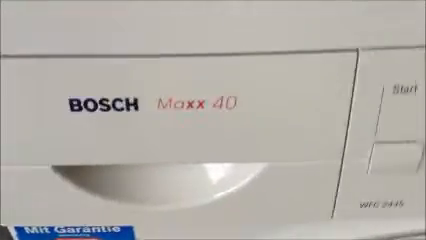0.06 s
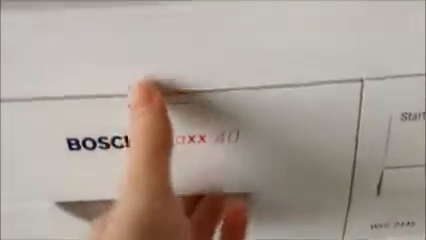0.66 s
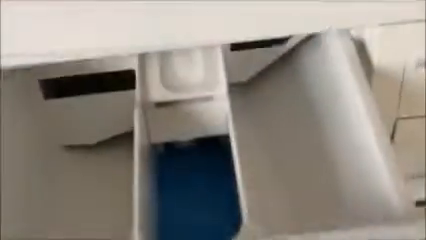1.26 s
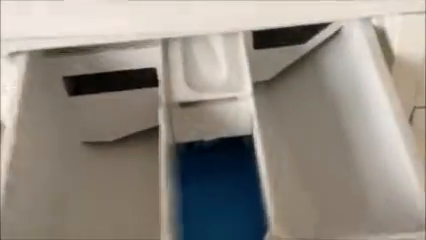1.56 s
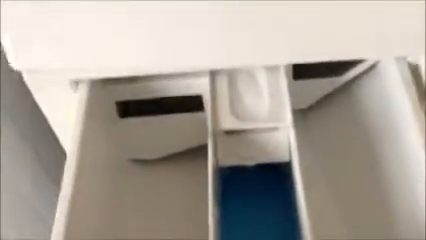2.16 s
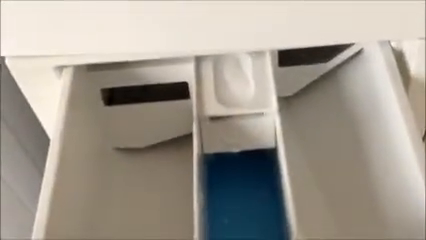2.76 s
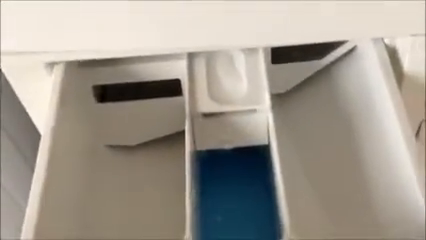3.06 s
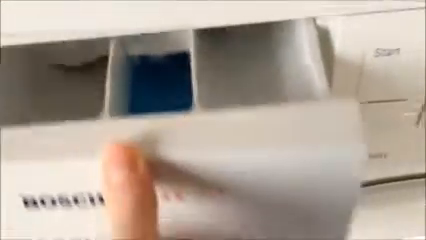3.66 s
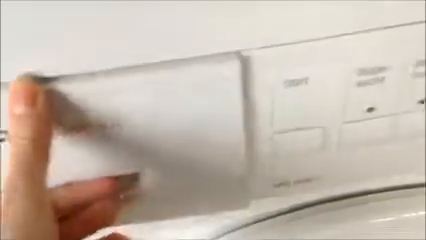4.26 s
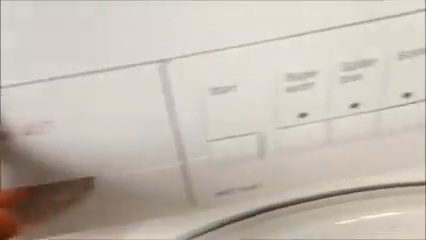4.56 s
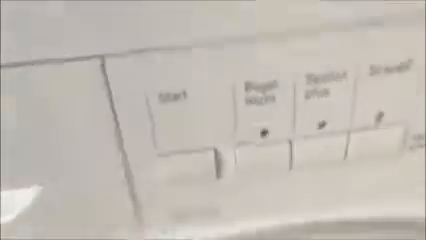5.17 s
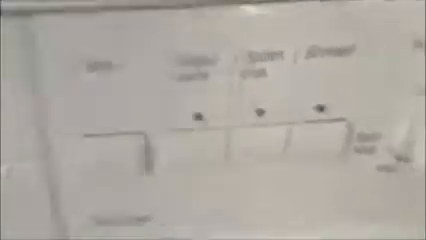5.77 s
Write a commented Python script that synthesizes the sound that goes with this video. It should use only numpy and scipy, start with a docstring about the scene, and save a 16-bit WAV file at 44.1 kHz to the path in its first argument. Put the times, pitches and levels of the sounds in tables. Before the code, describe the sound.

A washing machine's plastic detergent drawer is tugged free with a hollow clatter, scrapes outward and knocks against its stop. After a short pause it scrapes back in, rattles and knocks, making the steel cabinet boom, then shuts with a sharp snap. A sleeve rustles faintly and a finger bumps the close microphone. The small room echoes slightly over a quiet background.

```python
"""A washing machine's plastic detergent drawer is tugged out of its catch, slides to its stop,
is pushed back in with a clatter and snaps shut. Its runners scrape, a loose insert rattles and the
steel cabinet booms under each knock. A sleeve rustles, and fingers rub and bump the microphone.
The small room has hard walls that echo, and a quiet background noise."""
import sys
import numpy as np
from scipy import signal
from scipy.fft import rfft, irfft
from scipy.io import wavfile
from scipy.ndimage import uniform_filter1d

SR = 44100
rng = np.random.default_rng(int(sys.argv[2]) if len(sys.argv) > 2 else 0)


def to_wav(sig):
    """Store sig (one row per channel, or 1-D mono) as 16-bit WAV at the path in sys.argv[1].

    Samples outside -1..1 are clipped; the rate is SR.
    """
    pcm = np.clip(np.atleast_2d(sig), -1, 1) * 32767
    pcm = np.round(pcm).astype(np.int16)
    wavfile.write(sys.argv[1], SR, pcm.T)  # frames by channels


N = 265614
TIME = np.arange(N) / SR


# Levels in the tables are relative: the functions add their own gains.
# drawer knocks: t/s, clack level/dB, crack level/dB, boom level/dB, boom f/Hz, chatter fade/s
DRAWER_KNOCKS = [(0.755, -51, -48.5, -52, 201, 0.0015), (0.809, -50, -79, -48, 205, 0.011),
                 (0.866, -36.5, -45, -34.5, 210, 0.012), (0.880, -41, -38.5, -33, 226, 0.0054),
                 (0.898, -46, -53, -38, 237, 0.011), (0.939, -36.5, -48.5, -28, 224, 0.012),
                 (0.953, -40, -59, -42, 238, 0.014), (0.973, -38, -59, -33, 225, 0.0095),
                 (1.003, -46, -68, -36, 223, 0.0041), (1.044, -62, -46.5, -52, 233, 0.0088),
                 (1.125, -68, -45, -45.5, 246, 0.019), (1.209, -48, -45, -40.5, 256, 0.0073),
                 (1.723, -32.5, -40, -31.5, 259, 0.0033), (1.751, -51, -68, -49, 265, 0.0055),
                 (3.376, -41.5, -68, -41.5, 250, 0.005), (3.603, -47, -47, -47, 254, 0.0082),
                 (3.718, -62, -54, -44.5, 235, 0.0062), (4.019, -31.5, -38, -36.5, 257, 0.007),
                 (4.033, -34.5, -40, -39, 240, 0.0034), (4.041, -41, -62, -30.5, 216, 0.0047),
                 (4.077, -41, -72, -38.5, 208, 0.0041), (4.111, -44, -41, -32.5, 205, 0.013),
                 (4.149, -57, -47, -41, 204, 0.0045), (4.219, -49.5, -57, -42, 211, 0.0016),
                 (4.889, -49, -56, -51, 290, 0.034)]
# tone of the hollow clack and of the sharp crack: f/Hz, level/dB
CLACK_TONE = [(70, -34), (150, -26), (320, -5), (420, -4), (540, -0.5), (740, 3), (1100, -5), (1900, -22.5),
              (4000, -42), (10000, -83)]
CRACK_TONE = [(100, -49), (500, -32), (1200, -8), (1800, 5), (3500, 5.5), (4700, 1), (5700, -6.5),
              (8000, -8), (15000, -22)]
# notes of the steel cabinet: f/Hz, level/dB, ring time/s (the time to fade by 60 dB)
CABINET_NOTES = [(126, -25, .25), (146, -20, .35), (172, -24, .2), (209, -22, .4), (226, -15, .28),
                 (272, -16, .2), (322, -21, .15)]
# with the drawer out, the boom is higher and shorter: f/Hz, ring time/s
BOOM_RING_TIMES = [(215, .095), (260, 0.064)]
def knocks():
    """The drawer knocks and bounces twice; the first blow booms in the hollow and shakes the cabinet."""
    clack_bounce_db, crack_bounce_db, bounce_s = -15.5, -31, 0.033  # soft bounces hardly crack
    scatter_db, boom_rise_s, boom_lag_s = 3.5, 0.0013, 0.0023
    plastic, steel = np.zeros(N), np.zeros(N)
    for s, clack_db, crack_db, boom_db, boom_hz, chatter_s in DRAWER_KNOCKS:
        for bounce in range(3):
            force = tray(chatter(chatter_s))
            clack = from_db(clack_db + bounce * clack_bounce_db) * burst_one(colour(force, CLACK_TONE))
            crack = from_db(crack_db + bounce * crack_bounce_db) * burst_one(colour(force, CRACK_TONE))
            add(plastic, s + bounce * bounce_s, clack + crack)
        cabinet = [(hz, db + scatter_db * rng.standard_normal(), t60) for hz, db, t60 in CABINET_NOTES]
        hollow = [(boom_hz, 0, at_hz(BOOM_RING_TIMES, boom_hz))]
        boom = burst_one(ring(hollow + cabinet, size=SR // 2))
        boom *= 1 - np.exp(-TIME[:len(boom)] / boom_rise_s)
        add(steel, s + boom_lag_s, from_db(boom_db) * boom)
    # sheet metal gives off little sound below its lowest note
    return from_db(-2) * plastic, from_db(4.5) * cut(steel, 6, 125, "high")


# pitches that the plastic tray boosts or dips: f/Hz, width/Hz, boost/dB
TRAY_RESONANCES = [(539.7, 17, 6.5), (596, 20, 4), (712, 60, 1), (850, 100, 1), (1050, 29, 1),
                   (1200, 13, 4), (1328, 20, 8.5), (1420, 24, 1.5), (1650, 28, 1.5), (1855, 135, 5.5),
                   (2300, 31, -3), (2510, 63, 5), (3070, 49, -2), (3280, 200, 1.5), (3600, 94, 2.5),
                   (4320, 240, 2), (4580, 65, 3), (6500, 1800, 3.5)]
def tray(force):
    """The tray gives its own tone to whatever shakes it."""
    return resonate(force, TRAY_RESONANCES)


# drag on the runners, pulling out and pushing in: t/s, level/dB
PULL_DRAG = [(1.07, -49), (1.14, -46.5), (1.18, -46), (1.21, -42), (1.25, -46), (1.35, -50.5), (1.47, -54),
             (1.56, -60), (1.646, -88), (1.666, -63), (1.71, -59)]
PUSH_DRAG = [(3.31, -70), (3.43, -67), (3.47, -50.5), (3.51, -46), (3.62, -44.5), (3.675, -46.8),
             (3.745, -46.5), (3.812, -54), (3.834, -50.5), (4.005, -52)]
# tone of the scrape, the hiss and the rumble: f/Hz, level/dB
SCRAPE_TONE = [(200, -27.5), (440, -5), (590, -0.5), (850, -1.5), (1400, -4), (1800, -9), (3000, -7),
               (5000, -15.5), (12000, -29.5)]
HISS_TONE = [(800, -15), (2200, -8), (4000, -6), (5300, -8), (8000, -5), (11000, -12), (15000, -14.5)]
RUMBLE_TONE = [(60, -35), (100, -20), (135, -7), (190, -4), (270, 0), (325, -4), (400, -20), (900, -35)]
# pushing presses the runners harder, so they rasp: f/Hz, width/Hz, level/dB
RASP_BANDS = [(840, 130, 1), (1015, 250, 7), (1244, 130, 5), (1364, 98, 2.5)]
def runners():
    """Plastic drags on plastic: tiny slips scrape the tray, hiss, rasp and rumble in the cabinet."""
    pull_scrape, pull_hiss, pull_rumble, pull_rasp = stroke(PULL_DRAG, attack_s=0.2, release_s=0.084)
    push_scrape, push_hiss, push_rumble, push_rasp = stroke(PUSH_DRAG, attack_s=0.041, release_s=0.22)
    slips = tray(grains(per_s=4500, spread_db=0.5) * grip(flutter_db=1.5, per_s=65))
    scrape = rms_one(colour(slips, SCRAPE_TONE))
    # on the way out, the scrape's pitch sinks as more of the drawer stands free
    shut_hz, open_hz, width_hz, boost_db = 1570, 1040, 280, 6
    free_hz = shut_hz + (open_hz - shut_hz) * opening()
    sinking = scrape + (from_db(boost_db) - 1) * gliding_band(scrape, free_hz, width_hz)
    sound = from_db(-1) * pull_scrape * sinking + push_scrape * scrape  # pulling lifts the drawer
    sound += (pull_hiss + from_db(-2.5) * push_hiss) * rms_one(colour(slips, HISS_TONE))
    # a tight spot on the way out rasps at that same sinking pitch
    judder = grains(per_s=1300, spread_db=3)
    tight_spot = gliding_band(gliding_band(judder, free_hz, 2 * width_hz), free_hz, 2 * width_hz)
    pressed = sum(from_db(db) * band(band(judder, hz, 2 * width), hz, 2 * width)
                  for hz, width, db in RASP_BANDS)
    sound += from_db(-8.5) * pull_rasp * rms_one(tight_spot) + push_rasp * rms_one(pressed)
    return sound + (pull_rumble + push_rumble) * friction(RUMBLE_TONE, per_s=1000, spread_db=4)


def stroke(drag, attack_s, release_s):
    """Gains of scrape, hiss, rumble and rasp: each grows with the drag at its own rate."""
    s, db = np.transpose(drag)
    full_drag_db = -45.5
    extra_db = np.interp(TIME, s, db) - full_drag_db
    scrape_db = -51.5 + 0.83 * extra_db
    hiss_db = -57 + 1.6 * extra_db
    rumble_db = -54.5 + 0.51 * extra_db
    rasp_db = -51 + 2.15 * extra_db
    return from_db([scrape_db, hiss_db, rumble_db, rasp_db]) * fades(s[0], s[-1], attack_s, release_s)


# how far the drawer stands out: t/s, share of its travel
DRAWER_TRAVEL = [(.9, 0), (1.5, 1), (3.4, 1), (4.1, 0)]
def opening():
    """Where the drawer is at each moment, from 0 (shut) to 1 (open)."""
    return np.interp(TIME, *np.transpose(DRAWER_TRAVEL))


# clicks of the catch snapping shut: t/s, level/dB
CATCH_CLICKS = [(4.8772, -27), (4.8803, -18.5), (4.8823, -9), (4.8838, -8.5)]
# pitches that the front panel boosts: f/Hz, width/Hz, boost/dB
PANEL_RESONANCES = [(339, 40, 6), (453, 40, 2), (555, 40, 4), (795, 120, 5), (1050, 90, 6), (1211, 60, 3),
                    (1335, 50, 5), (1560, 140, 9), (2020, 130, 5), (2500, 130, 7), (2580, 160, 4),
                    (3752, 200, 1), (5825, 150, 3), (6700, 700, 2)]
# tone of the snap: f/Hz, level/dB
SNAP_TONE = [(70, -39), (140, -20), (300, -5.5), (500, -9.5), (750, 2.5), (1200, -11.5), (2500, 1.5),
             (2950, -8), (5000, -13.5), (7000, -11), (10000, -21), (15000, -29)]
def catch():
    """The catch jumps over its ridge in a few quick clicks, which sound through the front panel."""
    force = np.zeros(N)
    for s, db in CATCH_CLICKS:
        add(force, s, from_db(db) * click(chatter_s=0.00089, chatter_db=3.5))
    return from_db(-28) * burst_one(colour(resonate(force, PANEL_RESONANCES), SNAP_TONE))


# notes of the machine's casing: f/Hz, level/dB, ring time/s
CASING_NOTES = [(338, 1.5, 0.29), (470, 2, 0.36), (680, -9, .35), (790, -8, 0.18), (1064, -8, 0.62),
                (1335, -7, 0.17), (1577, -5, .3), (2010, -3, 0.23), (2060, -3.5, 0.41), (2535, -10, 0.27),
                (3270, -19, 0.34)]
def casing(rise_s=0.003):
    """The hardest click of the catch sets the casing ringing faintly."""
    out = np.zeros(N)
    s, _ = max(CATCH_CLICKS, key=lambda row: row[1])
    add(out, s, from_db(-47.5) * ring(CASING_NOTES) * (1 - np.exp(-TIME[:SR] / rise_s)))
    return out


# rattles of the loose insert: t/s, level/dB, bright up to f/Hz
INSERT_RATTLES = [(0.884, -38.5, 2000), (0.998, -65, 1900), (1.128, -59, 2600), (4.022, -37, 2500),
                  (4.035, -45, 800), (4.077, -49, 3300), (4.111, -42, 9200), (4.129, -53, 5500),
                  (4.15, -59, 6100), (4.18, -62, 2600)]
# notes of the insert: f/Hz, level/dB, ring time/s
INSERT_NOTES = [(1300, -3, .09), (1672, 0, 0.09), (1795, 2, 0.09), (1874, -3, 0.05), (2280, -8, 0.1),
                (2520, -6, .07), (3000, -5, .04), (3205, 1, .055), (3390, -2, .04), (3640, 1, 0.04),
                (4445, -7, .04), (4765, -4, 0.05)]
def rattles():
    """The loose insert chatters against the tray and rings briefly; soft touches sound duller."""
    out, notes = np.zeros(N), ring(INSERT_NOTES, size=SR // 3)
    for s, db, cut_hz in INSERT_RATTLES:
        force = cut(chatter(0.0027), 2, cut_hz, "low")
        add(out, s, from_db(db) * burst_one(signal.oaconvolve(force, notes)))
    return out


# soft, dull thuds: t/s, level/dB, f/Hz, fade/s
DULL_THUDS = [(0.578, -61, 456, 0.038), (1.778, -49.5, 145, 0.011), (4.243, -42.5, 158, 0.015),
              (4.495, -58.5, 696, 0.0045), (4.630, -54, 533, 0.0029), (4.854, -51.5, 167, 0.056),
              (5.245, -42, 534, 0.0072), (5.255, -47, 400, 0.017), (5.354, -58, 188, 0.02),
              (5.442, -49, 860, 0.0048), (5.941, -39.5, 250, 0.018), (5.977, -54, 275, 0.072)]
def thuds():
    """Soft, dull thuds with no ring: the drawer and cabinet settle after knocks, and the hand bumps."""
    out = np.zeros(N)
    for s, db, hz, fade_s in DULL_THUDS:
        edge_hz = 1.7 * hz  # the tone falls away steeply above this
        tone = [(hz / 6.3, -30), (hz / 1.68, -5), (hz, 0), (edge_hz, -2),
                (edge_hz * 1.56, -21), (edge_hz * 6, -42), (edge_hz * 20, -62)]
        add(out, s, from_db(db) * burst_one(colour(chatter(fade_s), tone)))
    return out


# the hand lets go and takes hold again: t/s, peak level/dB, touch level/dB, touch rise/s
HAND_BRUSHES = [(2.072, -62.5, -61, 0.17), (3.066, -64, -69.5, 0.096)]
# tone of skin on the drawer front: f/Hz, level/dB
FRONT_TONE = [(300, -9.5), (850, -5), (1100, 0), (1550, -6), (2000, -8.5), (2900, -6), (3600, -8),
              (5500, -16), (7500, -12), (10000, -19), (15000, -20)]
def brushes(peak_s=0.021):
    """Skin slides over the drawer front: a light touch with a short swell in its middle."""
    pressure = np.zeros(N)
    for s, peak_db, touch_db, touch_s in HAND_BRUSHES:
        pressure += from_db(peak_db) * fades(s, s, peak_s, peak_s)
        pressure += from_db(touch_db) * fades(s, s, touch_s, 1.18 * touch_s)
    return from_db(-2) * pressure * friction(FRONT_TONE, per_s=23000, spread_db=2.5)


# strokes of hand and sleeve: t/s, length/s, brush level/dB, hiss level/dB
SLEEVE_STROKES = [(4.442, 0.079, -58.5, -68), (4.675, 0.32, -67, -71), (5.043, 0.39, -78, -67.5),
                  (5.455, 0.074, -66.5, -58.5), (5.631, 0.042, -68, -58)]
# tone of the low brushing and of the cloth's hiss: f/Hz, level/dB
BRUSH_TONE = [(50, -27), (130, 11.5), (260, 7), (700, 2.5), (1500, -12), (2200, -10.5), (5000, -24.5)]
CLOTH_TONE = [(200, -9), (1000, 2), (2500, -4.5), (4500, -5), (8000, -10), (11500, -18), (15000, -20)]
def sleeve():
    """Skin and cloth brush softly as the hand comes and goes."""
    fibres = grains(per_s=11000, spread_db=1.5)
    brush, hiss = rms_one(colour(fibres, BRUSH_TONE)), rms_one(colour(fibres, CLOTH_TONE))
    out = np.zeros(N)
    for s, length_s, brush_db, hiss_db in SLEEVE_STROKES:
        swell = fades(s, s + length_s, attack_s=0.054, release_s=0.09)
        out += swell * (from_db(brush_db) * brush + from_db(hiss_db) * hiss)
    return from_db(-1) * out


# low rubs on the microphone, and high swishes (the one at 5.03 s brightens the sleeve's hiss): t/s, length/s,
# level/dB
FINGER_RUBS = [(0.064, 0.045, -39.5), (5.867, 0.047, -43)]
FINGER_SWISHES = [(0.263, 0.043, -68.5), (0.369, 0.26, -69), (5.033, 0.32, -70.5), (5.652, 0.078, -61),
                  (5.864, 0.049, -58)]
# tone of each: f/Hz, level/dB
RUB_TONE = [(40, -64), (80, -22), (150, 2.5), (420, -2), (800, -8.5), (1400, -11.5), (2400, -13.5),
            (4200, -17), (7000, -22.5), (10500, -32.5), (14000, -32), (15500, -29)]
SWISH_TONE = [(2000, -14), (5000, 1.5), (8000, 4.5), (11000, 0.5), (14500, 3.5)]
def fingers():
    """Fingers rub and swish over the microphone's case; one longer swish adds treble to the sleeve's rustle."""
    rub = friction(RUB_TONE, per_s=6000, spread_db=0.5)
    rub *= swells(FINGER_RUBS, attack_s=0.011, release_s=0.017)
    swish = friction(SWISH_TONE, per_s=31000, spread_db=3)
    swish *= swells(FINGER_SWISHES, attack_s=0.012, release_s=0.012)
    return rub + swish


# notes of the microphone's case: f/Hz, level/dB, ring time/s
MICROPHONE_NOTES = [(206, 26, 0.023), (336, 3.5, 0.028), (900, -33, 0.0021)]
def microphone_knock(s=5.8577, peak_db=-15):
    """A finger jolts the microphone's case, so its short ring starts with a steep edge."""
    # np.diff makes the edge but favours high notes, so turn those down first
    notes = ring([(hz, db - 20 * np.log10(hz), t60) for hz, db, t60 in MICROPHONE_NOTES])
    jolt = cut(np.diff(notes, prepend=0), 2, [80, 2300], "band")
    out = np.zeros(N)
    add(out, s, -from_db(peak_db) * jolt / np.abs(jolt).max())
    return out


# how long the room echoes: f/Hz, ring time/s
ROOM_RING_TIMES = [(200, .42), (600, .41), (2000, .38), (5000, .31), (14000, .18)]
# how much of the snap the panel sends into the room: f/Hz, level/dB
SNAP_SPREAD = [(200, -14), (350, 1.5), (650, -11.5), (1100, -2), (1700, -8.5), (2500, -14), (4000, -8),
               (7000, -6), (12000, -8)]
def room(sound, snap, size=SR * 3 // 4):
    """Hard walls return a wash of echoes, whose high pitches die first."""
    t, tail = TIME[:size], np.zeros(size)
    edges_hz = np.geomspace(110, 16000, 11)
    for low, high in zip(edges_hz, edges_hz[1:]):
        noise = cut(rng.standard_normal(size), 2, [low, high], "band")
        tail += noise * from_db(-60 * t / at_hz(ROOM_RING_TIMES, np.sqrt(low * high)))
    tail *= 1 - np.exp(-t / 0.0003)
    return signal.oaconvolve(sound + colour(snap, SNAP_SPREAD), tail / np.linalg.norm(tail))[:N]


# tone of the background noise: f/Hz, level/dB
BACKGROUND_TONE = [(15, -57), (25, 5.5), (66, -19.5), (182, -2), (296, -6), (347, -6), (594, -7.5),
                   (661, -7.5), (1040, -11.5), (2210, -14.5), (5670, -18), (7610, -20.5), (11000, -24),
                   (15000, -21.5)]
def background():
    """A faint, steady, mostly low noise."""
    return from_db(-68.5) * rms_one(colour(rng.standard_normal(N), BACKGROUND_TONE))


def chatter(fade_s, size=SR // 3):
    """Loose parts meet at many points: the tiny hits build up quickly, then die away."""
    t = TIME[:size]
    return rng.standard_normal(size) * (1 - np.exp(-t / 0.0013)) * np.exp(-t / fade_s)


def click(chatter_s, chatter_db, size=SR // 3):
    """One sharp push, followed by tiny hits that die away."""
    hits = rng.standard_normal(size) * np.exp(-TIME[:size] / chatter_s)
    force = from_db(chatter_db) * hits / np.linalg.norm(hits)
    force[0] += 1
    return force


def grains(per_s, spread_db):
    """Tiny slips at random moments and of uneven size."""
    sizes = from_db(spread_db * np.minimum(rng.exponential(1, N), 4)) * rng.standard_normal(N)
    return sizes * (rng.random(N) < per_s / SR)


def friction(tone, per_s, spread_db):
    """Steady rubbing: many tiny slips with the given tone."""
    return rms_one(colour(grains(per_s, spread_db), tone))


def grip(flutter_db, per_s):
    """The surfaces catch and let go at random: a gain that wanders around 1."""
    return from_db(flutter_db * np.interp(TIME * per_s, np.arange(N), rng.standard_normal(N)))


def ring(notes, size=SR):
    """A struck part rings: each note fades by 60 dB in its ring time, t60."""
    t = TIME[:size]
    return sum(from_db(db - 60 * t / t60) * np.sin(2 * np.pi * hz * t) for hz, db, t60 in notes)


def resonate(x, resonances):
    """Boost or dip a sound at each of a part's own pitches."""
    for hz, width_hz, boost_db in resonances:
        x = x + (from_db(boost_db) - 1) * band(x, hz, width_hz)
    return x


def band(x, hz, width_hz):
    """Keep the sound near one pitch."""
    return signal.lfilter(*signal.iirpeak(hz, hz / width_hz, fs=SR), x)


def gliding_band(x, hz, width_hz, size=512):
    """Keep the sound near a moving pitch."""
    out, state = np.zeros(N), np.zeros(2)
    for i in range(0, N, size):
        peak = signal.iirpeak(hz[i], hz[i] / width_hz, fs=SR)
        out[i:i + size], state = signal.lfilter(*peak, x[i:i + size], zi=state)
    return out


def cut(x, order, hz, keep):
    """Keep the lows, the highs or a band; a higher order cuts the rest more steeply."""
    return signal.sosfilt(signal.butter(order, hz, keep, fs=SR, output="sos"), x)


def colour(x, tone, size=2 ** 13):
    """Give a sound a tone, with nothing heard ahead of a hit (a minimum-phase filter)."""
    gains = from_db(at_hz(tone, np.arange(size // 2 + 1) * SR / size))
    cepstrum = irfft(np.log(gains))
    cepstrum[1:size // 2] *= 2
    cepstrum[size // 2 + 1:] = 0
    response = irfft(np.exp(rfft(cepstrum)))[:size // 2]
    return signal.oaconvolve(x, response)[:len(x)]


def fades(start, end, attack_s, release_s):
    """Full gain between two times, with a smooth rise before and fall after."""
    outside = np.maximum(start - TIME, 0) / attack_s + np.maximum(TIME - end, 0) / release_s
    return np.exp(-np.minimum(outside, 10) ** 2)


def swells(touches, attack_s, release_s):
    """A gain that rises and falls with each touch."""
    return sum(from_db(db) * fades(s, s + length_s, attack_s, release_s) for s, length_s, db in touches)


def from_db(db):
    """Turn decibels into a gain."""
    return 10 ** (np.asarray(db) / 20)


def rms_one(x):
    """Scale a sound to an average strength (rms) of 1."""
    return x / np.sqrt(np.mean(x ** 2) + 1e-20)


def burst_one(x, size=350):
    """Scale a blow so that its loudest moment has a strength of 1."""
    return x / np.sqrt(uniform_filter1d(x ** 2, size).max() + 1e-20)


def at_hz(points, hz):
    """Read between a table's rows, with octaves evenly spaced."""
    known_hz, values = np.transpose(points)
    return np.interp(np.log(np.maximum(hz, 1)), np.log(known_hz), values)


def add(track, s, sound):
    """Mix a sound into a track, starting at s seconds."""
    start = round(s * SR)
    track[start:start + len(sound)] += sound[:N - start]


def scene():
    """Drawer, hand and room over a quiet background."""
    plastic, steel = knocks()
    plastic += rattles()
    slide, snap, dull = runners(), catch(), thuds()
    # the open drawer is close to the microphone, so it brings less echo with it
    echo_share = from_db(-3.5 * opening())
    drawer_to_room = echo_share * (from_db(-7.5) * plastic + from_db(-2.5) * slide)
    echoes = room(drawer_to_room + from_db(-7) * steel + from_db(-3) * dull, snap)
    surroundings = echoes + background()
    machine = plastic + steel + slide + snap + casing()
    hand = sleeve() + brushes() + fingers() + microphone_knock()
    return (machine + dull + hand + surroundings)[None]


def record(dry, bass_hz=85, top_hz=15400):
    """The small microphone loses the deep bass, and the very highest treble is cut."""
    thin = cut(dry, 2, bass_hz, "high")
    return signal.sosfilt(signal.ellip(10, .2, 70, top_hz, fs=SR, output="sos"), thin)


dry = scene()
out = record(dry)
to_wav(out)
```